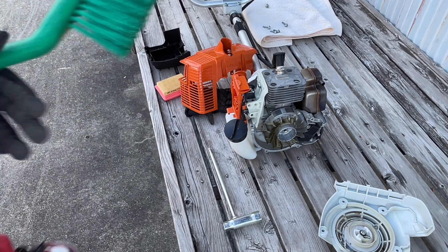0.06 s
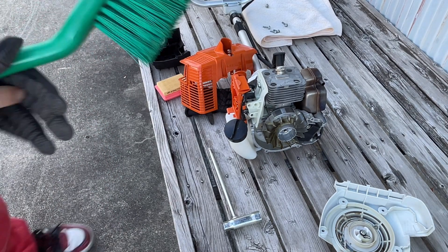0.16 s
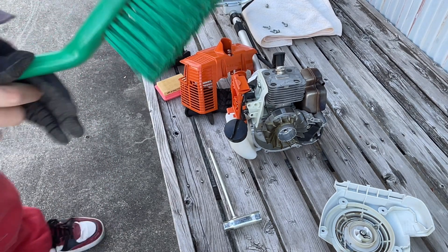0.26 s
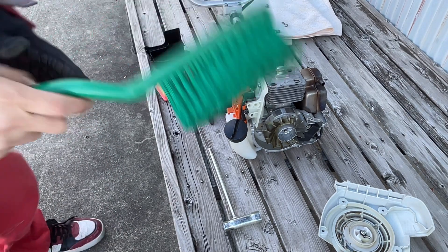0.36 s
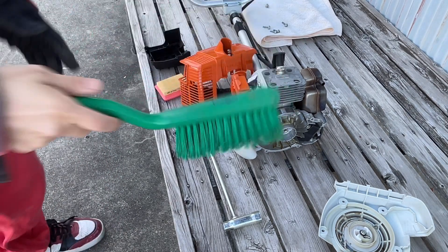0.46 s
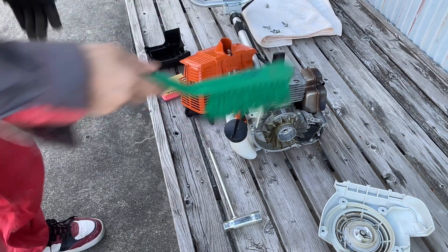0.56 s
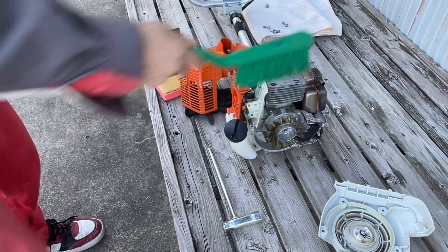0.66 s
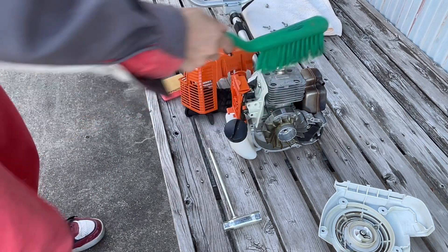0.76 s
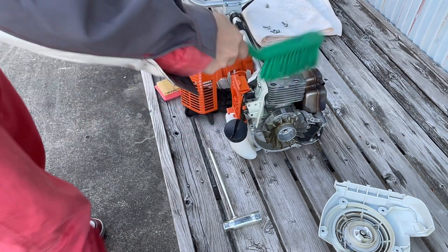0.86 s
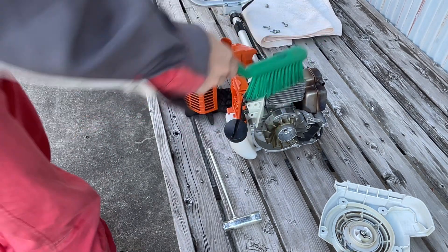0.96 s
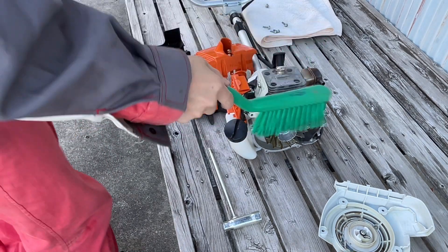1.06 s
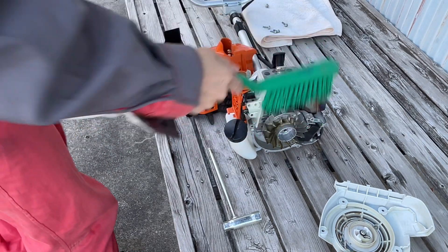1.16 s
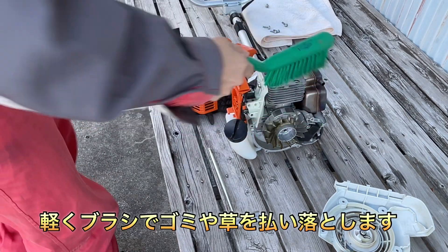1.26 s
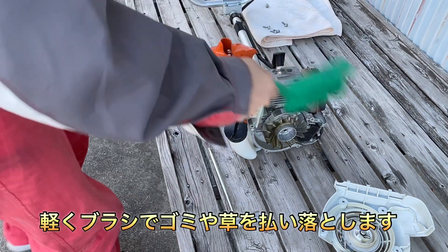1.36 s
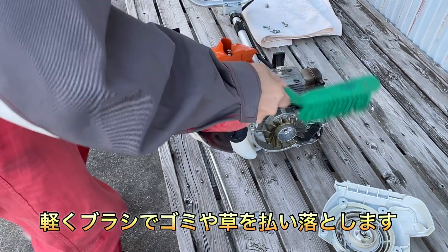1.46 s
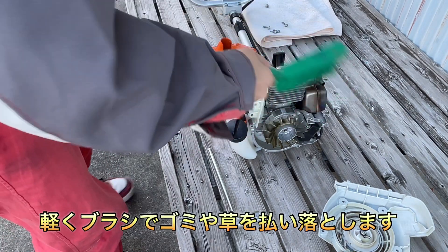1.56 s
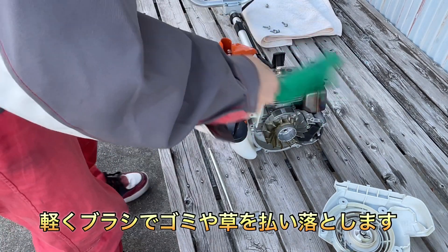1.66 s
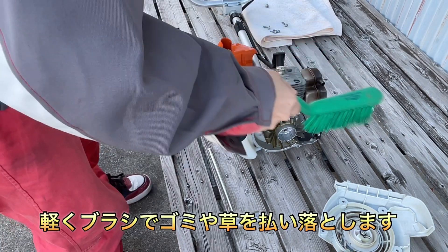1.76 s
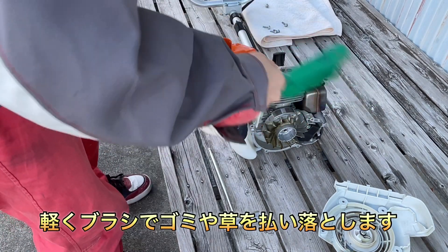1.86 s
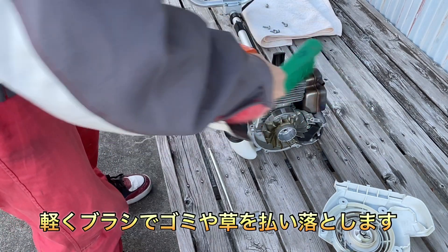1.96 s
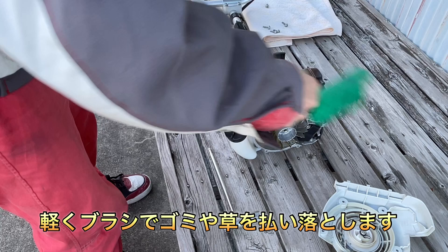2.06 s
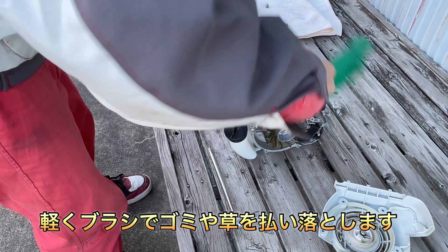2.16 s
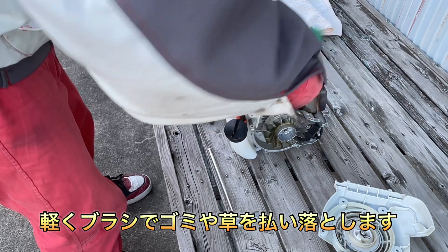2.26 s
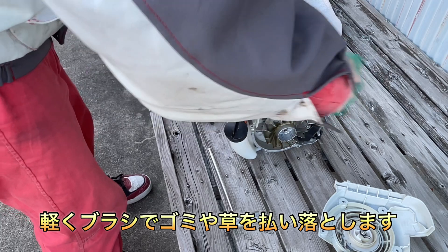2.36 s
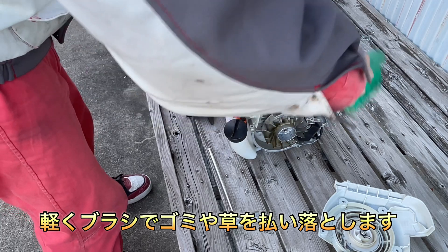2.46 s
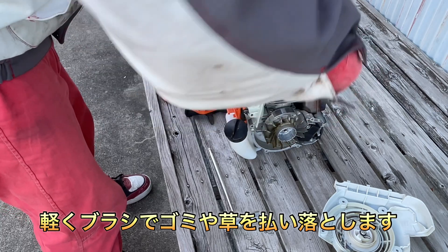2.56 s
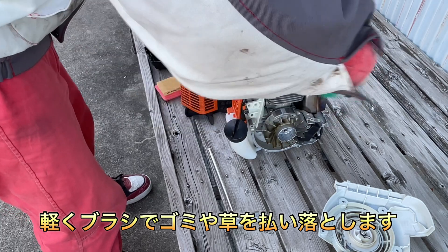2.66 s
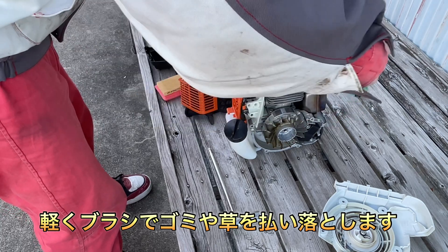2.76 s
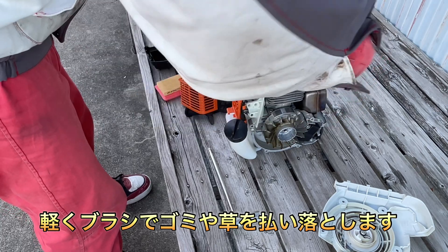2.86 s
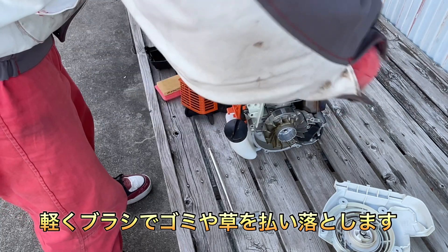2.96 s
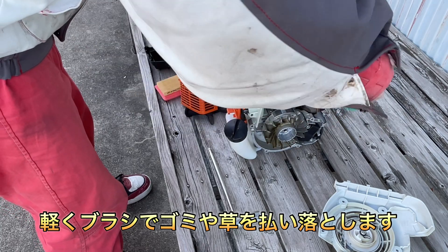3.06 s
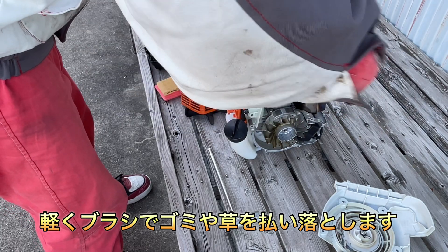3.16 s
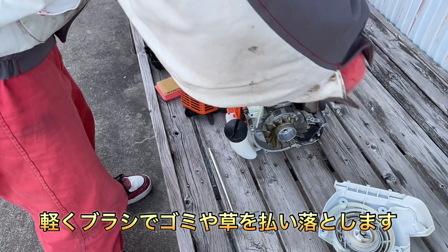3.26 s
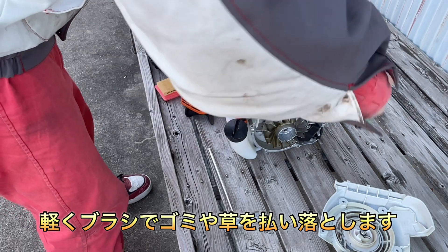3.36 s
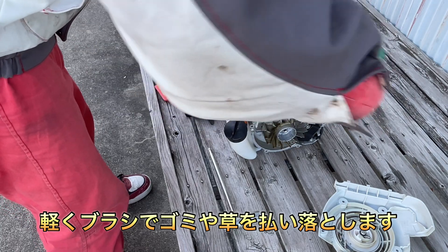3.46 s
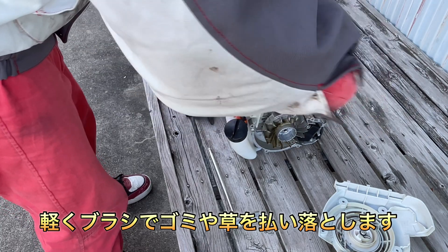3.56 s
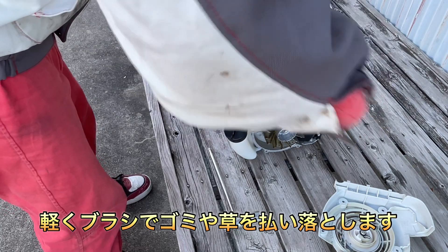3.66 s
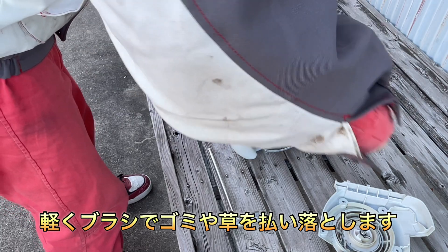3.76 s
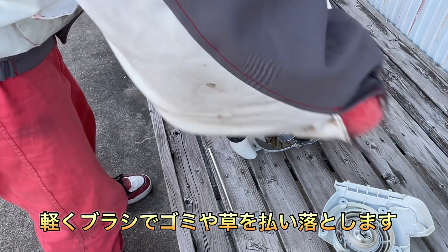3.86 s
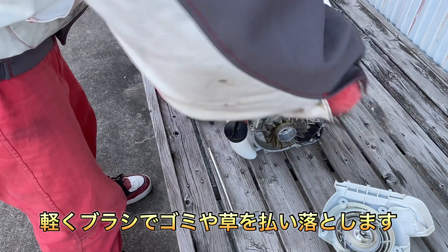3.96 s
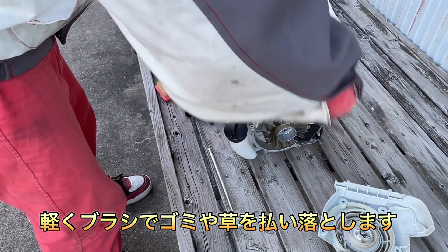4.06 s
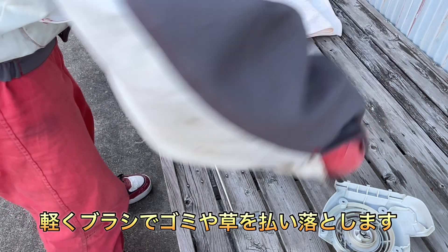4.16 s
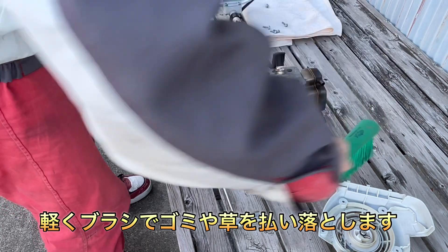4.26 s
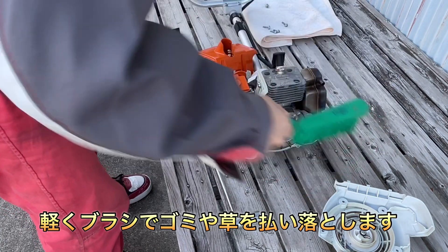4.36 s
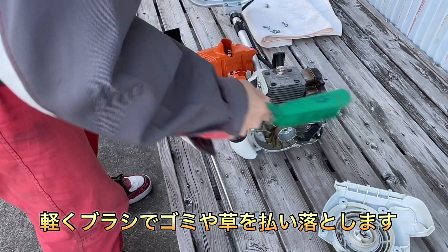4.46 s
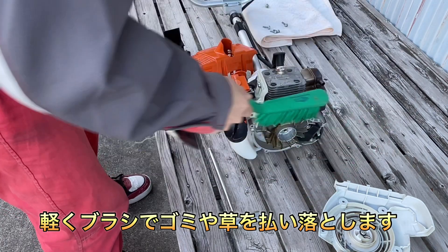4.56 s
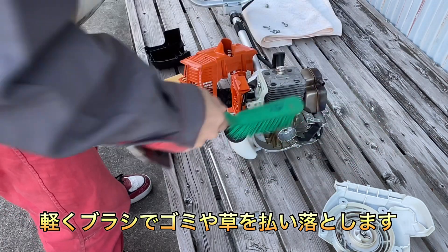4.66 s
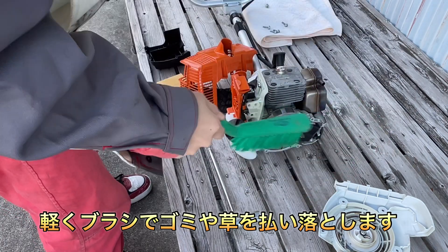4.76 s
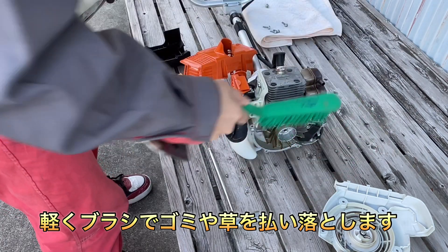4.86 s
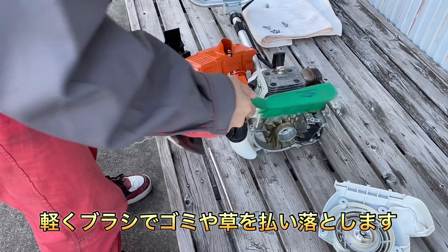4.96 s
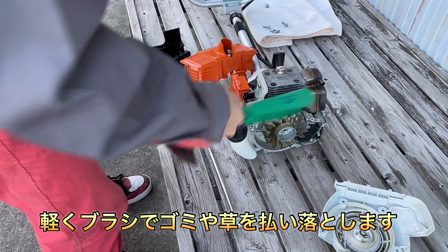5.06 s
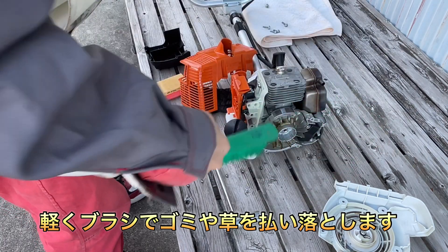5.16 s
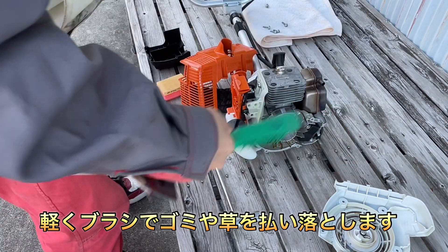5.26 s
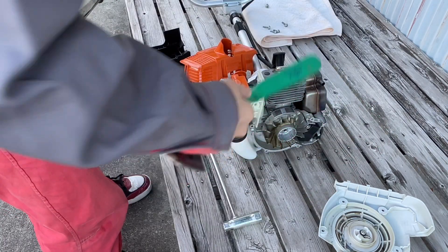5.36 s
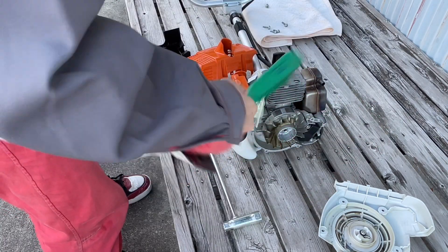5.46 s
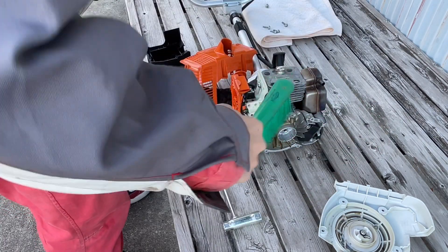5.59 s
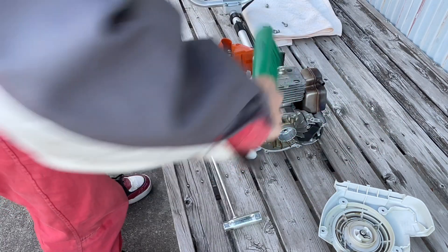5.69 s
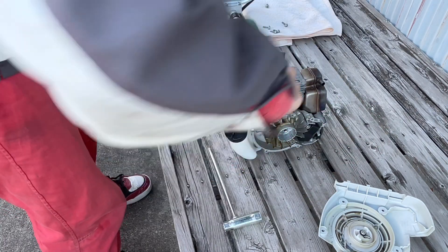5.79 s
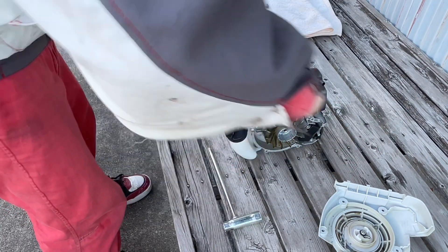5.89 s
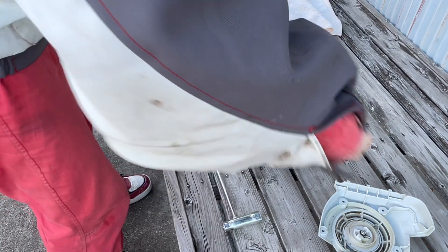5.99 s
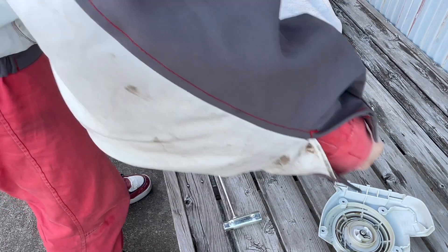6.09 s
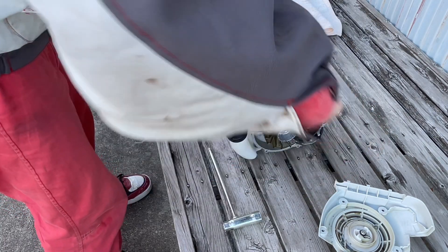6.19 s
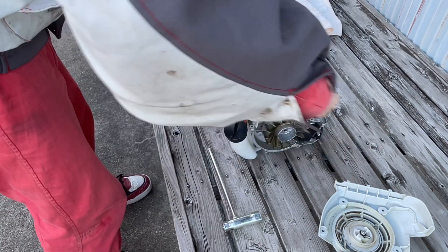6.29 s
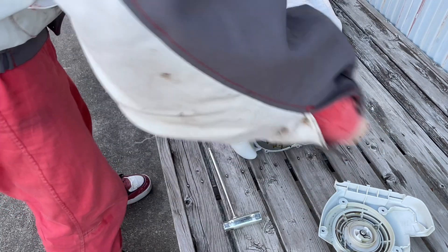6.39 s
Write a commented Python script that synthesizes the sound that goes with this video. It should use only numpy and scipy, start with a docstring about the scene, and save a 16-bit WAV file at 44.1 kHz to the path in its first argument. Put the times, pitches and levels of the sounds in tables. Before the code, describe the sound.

Outdoors on a plank deck, close stereo microphone, faint distant traffic and air throughout. From 0 to 0.85 s there are only low wind thumps and a few faint wooden knocks. At 0.9 s a stiff plastic brush lands on small metal fins with a bright, scratchy slap; wind buffets hard around 1.0-1.8 s, then mostly dies down. Strokes follow every third of a second until about 4.0 s, each a short rasping swish with fizzing bristle tips, a thin metallic ring and a flick as bristles spring free. From 2.3 to 4.3 s the fins ring more clearly and the rocking engine's feet knock in hollow double or triple taps on the boards. The pace then eases: softer strokes near 4.5, 5.0, 5.45, 5.85 and 6.3 s, with a sharp high metallic tick at 5.0 s, a few pinging fins and light knocks at 5.9 and 6.35 s.

```python
"""A plank deck outdoors: a stiff plastic brush slaps and drags across the cooling fins of a small engine.
Bursts of random bristle snaps drive resonant fins; a few freed fins ring on as decaying sines.
Each stroke rocks the engine, whose feet knock on the boards: short pulses through plank resonances.
Wind rumbles and thumps at the two microphone ports as low filtered noise and brief low waves.
Behind it lies the distant hush of the yard, noise shaped in short-time spectra."""
import sys
import numpy as np
from scipy import signal
from scipy.fft import rfft, irfft, next_fast_len
from scipy.io import wavfile
from scipy.ndimage import uniform_filter1d

SR = 44100
rng = np.random.default_rng(int(sys.argv[2]) if len(sys.argv) > 2 else 0)


def file_out(sig):
    """Save sig as 16-bit WAV at sys.argv[1]."""
    # one column per channel
    cols = np.atleast_2d(sig).T
    # limit, then scale
    lim = np.clip(cols, -1, 1)
    pcm = np.round(lim * 32767).astype(np.int16)
    wavfile.write(sys.argv[1], SR, pcm)


N = 283563

# the bristles land on the fins:
# (time_s, level_db, thick_fin_hz, thick_fin_db, thin_fin_hz, thin_fin_db, landing_ms)
SLAPS = [(0.9036, -23, 2100, -22, 4160, -5, 3.36), (1.3112, -26.5, 2030, -17, 3750, -12, 6.4),
         (1.6122, -29.5, 2140, -7.5, 3750, -7.5, 5.6), (1.936, -26.5, 2180, -11.5, 3900, -8.5, 4.7),
         (2.2751, -27, 1677, -1, 4010, 2.5, 3.25), (2.6029, -21, 1988, 7, 4180, -2.5, 4.1),
         (2.9052, -22.5, 1974, 3, 4450, 3, 3.4), (3.2473, -24, 1958, 2.5, 4410, 2.5, 4.06),
         (3.6078, -24, 1981, 4.5, 4350, -1.5, 4.76), (4.0313, -22, 1160, -9, 4300, -8, 4.5),
         (4.4895, -45, 1300, -14, 4340, -1.5, 7.4), (4.512, -38, 1936, 0.5, 4300, -2.5, 7.4),
         (4.9685, -41.5, 1600, -1, 3910, -18, 4.2), (4.9784, -29.5, 1475, -13.5, 3830, -30, 6.8),
         (5.4638, -28, 2140, -16, 4210, -4.5, 10), (5.8303, -33.5, 2184, 6.5, 3970, 2.5, 9.5),
         (6.277, -28.5, 1580, -7.5, 3880, -1.5, 11.8)]
LAND_LEAD_S = 0.00395  # the bristles touch this long before the listed time
TIPS_DB_PER_MS = -0.58  # a slower landing leans less on the tips, all through the stroke


def amp(db):
    """Amplitude ratio of a level in dB."""
    return 10 ** (np.asarray(db) / 20)


def evened(x):
    """The signal scaled to an rms of 1."""
    return x / np.sqrt(np.mean(x ** 2) + 1e-20)


def read(points, hz):
    """Value at hz of a curve of (hz, value) points, straight over log frequency."""
    f, value = np.transpose(points)
    return np.interp(np.log(hz + 1), np.log(f + 1), value)


def add(mix, s, sound):
    """Lay a sound into the mix at s seconds, cut off at the end."""
    part = mix[round(s * SR):][:len(sound)]
    part += sound[:len(part)]


def resonate(x, hz, width):
    """Resonance that follows hz: shift to 0 Hz, smooth, shift back; white noise keeps its rms."""
    turn = np.exp(2j * np.pi * np.cumsum(hz * np.ones(len(x))) / SR)
    r = np.exp(-np.pi * width / SR)
    smooth = signal.lfilter([1 - r], [1, -r], x / turn)
    return 2 * (turn * smooth).real / np.sqrt(np.pi * width / SR)


def ring(x, modes, detune=1, patchy_db=0):
    """Sum of resonances (hz, width_hz, level_db); the contact with each one comes and goes."""
    drift = uniform_filter1d(rng.standard_normal((len(modes), N // 64 + 1)), 14, 1)
    contact = amp(patchy_db * np.clip(evened(drift), -3, 1.5))  # one value per 64 samples
    out = np.zeros(N)
    for k, (hz, width, db) in enumerate(modes):
        drive = x * np.repeat(contact[k], 64)[:N]
        out += (-1) ** k * amp(db) * resonate(drive, hz * detune, width)
    return out


def colour(x, points):
    """Causal minimum-phase filter with the given spectrum, its taps scaled to energy 1."""
    log_gain = np.log(amp(read(points, abs(np.fft.fftfreq(2048, 1 / SR)))))
    taps = np.fft.ifft(np.exp(np.conj(signal.hilbert(log_gain)))).real[:1024]
    return signal.oaconvolve(x, taps / np.linalg.norm(taps))[:N]


def wavering(hz, width):
    """A tone of nearly steady strength whose pitch wanders: narrow noise divided by its envelope."""
    x = resonate(rng.standard_normal(N), hz, width)
    return x / (abs(signal.hilbert(x)) + 0.15)


def bristles(per_s, spread_db):
    """Dense random snaps of single bristles, a few of them strong."""
    size = amp(spread_db * np.minimum(rng.exponential(1, N), 5))
    return evened(size * rng.standard_normal(N) * (rng.random(N) < per_s / SR))


def land(thick, thin, low, shafts, tips):
    """Each landing adds a quick swell and decay to the strength of every part it excites."""
    shafts_db, tips_db, body_db = -5, -3.5, -21.5  # shares of a landing
    body_db_per_ms = 1.5  # a slower, flatter landing spreads over more of the cylinder
    thick_lead_s = 0.0039
    for s, db, _, thick_db, _, thin_db, ms in SLAPS:
        u = np.arange(round(.08 * SR)) / SR / (ms / 1000)
        late = 0.033 * (1 - np.exp(-u)) * np.exp(-u / 1.2)  # late bristles trail in
        landing = amp(db) * ((u * np.exp(1 - u)) ** 2.14 + late)
        shares = ((thin, thin_db), (low, body_db + body_db_per_ms * ms),
                  (shafts, shafts_db), (tips, tips_db + TIPS_DB_PER_MS * ms))
        for line, gain_db in shares:
            add(line, s - LAND_LEAD_S, amp(gain_db) * landing)
        slow = u / 1.19  # the thick fin takes longer to build up
        build = (slow * np.exp(1 - slow)) ** 3.0 + 0.025 * slow * np.exp(-slow / 0.91)
        add(thick, s - thick_lead_s, amp(db + thick_db) * build)


def drag(low, shafts, tips):
    """After landing the bristles drag under a held pressure, then flick free."""
    # the flick that ends each drag: (flick_start_s, flick_end_s, drag_db, flick_db)
    drag_table = [(0.962, 1.011, -50, -43), (1.33, 1.34, -45, -61), (1.673, 1.683, -44, -51),
                  (1.98, 2.012, -52, -43), (2.31, 2.356, -67, -37), (2.65, 2.674, -75, -36),
                  (2.956, 3.005, -62, -38.5), (3.299, 3.333, -54, -36.5), (3.639, 3.684, -60, -42),
                  (4.081, 4.152, -65, -41.5), (4.605, 4.672, -47, -46.5), (5.084, 5.13, -46.5, -35.5),
                  (5.504, 5.539, -48, -37.5), (5.917, 5.998, -45.5, -38.5), (6.34, 6.399, -46, -39.5)]
    after_s, rise_s, rise_db = 0.0043, .01, 34  # the drag swells in behind each landing
    flick_rise_s = 0.013  # the change to the flick takes this long each side of its start
    release_s, release_db = 0.0087, 81
    tips_db, body_db = 2.5, -33
    slaps = np.array(SLAPS)
    for begin, end, drag_db, flick_db in drag_table:
        landed_s, *_, ms = slaps[slaps[:, 0] < begin][-1]
        flick_from, flick_full = begin - flick_rise_s, begin + flick_rise_s
        start = min(landed_s + after_s, flick_from)
        t = np.arange(start - rise_s, end + release_s, 1 / SR)
        turns = [t[0], start, flick_from, flick_full, max(end, flick_full), end + release_s]
        levels = [drag_db - rise_db, drag_db, drag_db, flick_db, flick_db, flick_db - release_db]
        pressure = amp(np.interp(t, turns, levels))
        for line, gain_db in (low, body_db), (shafts, 0), (tips, tips_db + TIPS_DB_PER_MS * ms):
            add(line, t[0], amp(gain_db) * pressure)


def brush():
    """Landing and dragging bristles scratch the metal and drive the fins under them."""
    # fin resonances before detuning: (hz, width_hz, level_db)
    fin_modes = [(2920, 120, -11.5), (3862, 90, 2), (4220, 140, 0.5), (4985, 65, -5.5), (5530, 48, -15),
                 (7560, 480, -8)]
    # higher fin resonances before detuning: (hz, width_hz, level_db)
    top_modes = [(10740, 490, -4.5), (11440, 150, -12), (12700, 290, -9), (16300, 93, -73)]
    # spectrum of the scratching bristle shafts: (hz, level_db)
    scratch_curve = [(700, -27.5), (1300, -5), (2500, -3.5), (3200, -5), (4500, -7), (5500, -1),
                     (7200, 10.5), (7900, 0), (9000, -60)]
    # spectrum of the fizzing bristle tips: (hz, level_db)
    fizz_curve = [(7000, -30), (7900, -1.5), (11000, -.5), (12500, -1.5), (16000, 0)]
    thick, thin, low, shafts, tips = np.zeros((5, N))
    land(thick, thin, low, shafts, tips)
    drag(low, shafts, tips)

    slaps = np.array(SLAPS)
    stroke = np.maximum(np.searchsorted(slaps[:, 0] - LAND_LEAD_S, np.arange(N) / SR) - 1, 0)
    fin = slaps[stroke]
    detune = 1 + 0.033 * rng.standard_normal(len(slaps))[stroke]  # other fins under each landing
    rasp = amp(1.4 * evened(uniform_filter1d(rng.standard_normal(N), 200)))  # tufts catch and let go
    snaps = evened(rasp * bristles(9000, spread_db=2.2))
    shaft_snaps, tip_snaps = shafts * snaps, tips * snaps

    thick_parts = ((1, 0.89), (0.92, 0.11), (.85, 0.23))  # (pitch ratio, share)
    out = thick * sum(wavering(fin[:, 2] * k, 66) * share for k, share in thick_parts)
    out += thin * wavering(fin[:, 4], 300)
    out += 0.078 * resonate(resonate(low * snaps, 2230, 1100), 1900, 860)  # the cylinder body
    out += 0.72 * colour(shaft_snaps, scratch_curve)
    out += 0.15 * ring(shaft_snaps, fin_modes, detune, patchy_db=2.2)
    out += 0.66 * colour(tip_snaps, fizz_curve)
    return out + 0.48 * ring(tip_snaps, top_modes, detune, patchy_db=4.5)


def plucks():
    """Each fin the brush frees swells for a few ms and dies away as a decaying sine."""
    # the brush frees a fin: (time_s, level_db, fin_letter)
    pluck_table = [(1.66, -41, "a"), (1.66, -44, "d"), (1.66, -41.5, "f"), (2.0, -48, "d"),
                   (2.36, -62, "g"), (2.615, -37, "d"), (2.69, -62.5, "c"), (2.69, -64, "g"),
                   (2.995, -55, "c"), (3.0, -62, "g"), (3.33, -58.5, "c"), (3.33, -63, "g"),
                   (3.7, -55.5, "c"), (4.093, -30, "b"), (4.15, -62, "g"), (4.65, -46, "f"),
                   (4.975, -16.5, "h"), (5.105, -36, "i"), (5.905, -31.5, "e"), (5.945, -32.5, "f"),
                   (5.99, -50, "g")]
    # fins that ring on, by letter: (pitch_hz, t60_s)
    ring_table = {"a": (2090, .1), "b": (2450, .053), "c": (2552, .7), "d": (3870, .1), "e": (4160, .065),
                  "f": (4410, .14), "g": (4830, .24), "h": (7400, .04), "i": (2190, .06)}
    out, t = np.zeros(N), np.arange(SR // 2) / SR
    for s, db, letter in pluck_table:
        hz, t60 = ring_table[letter]
        swell = 1 - np.exp(-t / 0.0029)
        add(out, s, amp(db - 60 * t / t60) * swell * np.sin(2 * np.pi * hz * t))
    return out


def knocks():
    """A foot strikes, then the weight follows: stiff plank modes ring first, the low ones swell after."""
    # the engine's feet knock on the planks, about 21 times a second while it rocks: (time_s, level_db)
    knock_table = [(0.128, -49), (0.223, -45), (0.503, -47.5), (0.847, -44.5), (0.943, -36.5), (1.088, -41),
                   (1.351, -40.5), (1.4, -54), (1.498, -44), (1.653, -36.5), (1.701, -36.5), (1.981, -38),
                   (2.025, -46), (2.071, -41.5), (2.309, -30), (2.358, -29), (2.402, -36.5), (2.641, -33),
                   (2.689, -28.5), (2.74, -35), (2.796, -46), (2.845, -42.5), (2.936, -29), (2.987, -28),
                   (3.028, -34), (3.28, -31), (3.329, -31.5), (3.642, -31), (3.689, -29), (3.734, -33.5),
                   (3.795, -44), (4.069, -28.5), (4.116, -35.5), (4.171, -37.5), (4.264, -43),
                   (4.313, -37.5), (5.885, -41.5), (5.934, -37.5), (5.982, -44), (6.328, -35),
                   (6.373, -39.5)]
    # low plank modes before detuning: (hz, width_hz, level_db)
    low_modes = [(202.6, 14, -5), (390, 33, 4), (503, 210, -13)]
    # stiff plank modes before detuning: (hz, width_hz, level_db)
    high_modes = [(463, 290, 0), (720, 76, 5), (971, 39, 0), (1167, 30, -2.5), (1590, 480, -1.5)]
    rock_gap_s = .07  # a longer pause starts a new rocking
    bright_start_db, dulling_db_per_s = 4, 50  # the stiff modes fade as the rocking settles
    low_lag_s, high_lead_s = .002, .003
    low, high, u = np.zeros(N), np.zeros(N), np.arange(900) / SR
    grit = rng.standard_normal((len(knock_table), 901))
    times = np.transpose(knock_table)[0]
    began = np.maximum.accumulate(times * (np.diff(times, prepend=-1) > rock_gap_s))
    for (s, db), first_s, noise in zip(knock_table, began, grit[:, 1:]):
        bright_db = bright_start_db - dulling_db_per_s * (s - first_s)
        weight = u / 0.00091 * np.exp(-u / 0.00092) + 0.1 * noise * np.exp(-u / 0.028)
        strike = u / 0.00062 * np.exp(-u / 0.00039) + 0.14 * noise * u / 0.0032 * np.exp(-u / 0.0071)
        add(low, s + low_lag_s, amp(db) * weight)
        add(high, s - high_lead_s, amp(db + bright_db) * strike)
    spot = np.maximum(np.searchsorted(times - high_lead_s, np.arange(N) / SR) - 1, 0)
    detune = 1 + 0.035 * grit[spot, 0]  # each foot lands on a slightly different spot
    return ring(low, low_modes, detune, patchy_db=2.5) + ring(high, high_modes, detune, patchy_db=3.0)


def deck(x):
    """Random echoes off planks, wall and sleeve, dying 60 dB in about 0.14 s, partly different at each port."""
    t = np.arange(SR // 2) / SR
    hits = rng.choice([-1., 1.], (3, len(t))) * (rng.random((3, len(t))) < 4000 / SR)
    hits *= 1 - np.exp(-t / 0.00044)
    decay = amp(-60 * t / 0.14) + amp(-26.0 - 60 * t / 0.13)
    taps = (hits[:2] + 1.78 * hits[2]) * decay  # the third set is common to both ports
    taps /= np.linalg.norm(taps, axis=1, keepdims=True)
    return signal.fftconvolve(x[None], taps, axes=1)[:, :N]


def wind():
    """Eddies at the ports: a low lumpy rumble and single thumps, mostly common to both."""
    # level of the rumble: (time_s, level_db)
    rumble_table = [(0.0, -39), (0.16, -43), (0.3, -50.5), (0.99, -44.5), (1.11, -33.5), (1.29, -43.5),
                    (1.41, -36), (2.0, -84), (2.36, -59), (2.76, -50), (3.33, -47), (3.47, -52.5),
                    (3.89, -50.5), (5.03, -50.5), (5.19, -48), (5.69, -49.5), (5.82, -47.5), (6.43, -47)]
    # single eddies thump the ports: (time_s, level_db, pitch_hz)
    thump_table = [(0.03, -31, 63), (0.23, -32, 68), (0.655, -30, 61), (0.99, -23.5, 64),
                   (1.016, -28.5, 115), (1.066, -18, 64), (1.094, -28, 90.5), (1.142, -22, 63.6),
                   (1.226, -27, 60.4), (1.309, -33.5, 65), (1.423, -20, 72), (1.707, -27, 90),
                   (1.725, -22.5, 154), (1.792, -32, 73), (4.774, -38.5, 66), (5.075, -34.5, 63.6),
                   (5.451, -32.5, 58.6)]
    thump_cycles = 1.3
    # a puff of rough air rises with each thump and dies away after it
    puff_db, puff_hz, puff_width_hz, puff_s = -19.5, 157.4, 123, 0.019
    noises = rng.standard_normal((3, N))
    common, left, right = (resonate(resonate(z, 57, 54), 51, 107) for z in noises)
    envelope = abs(signal.hilbert(common))
    common = evened(common / (envelope + 0.18 * common.std()) ** 0.41)  # partly levelled
    level = amp(np.interp(np.arange(N) / SR, *np.transpose(rumble_table)))
    rumble = level * (common + 0.45 * evened(np.array([left, right])))
    thumps, puffs = np.zeros((2, N))
    for s, db, hz in thump_table:
        t = np.arange(-min(s, .06), .06, 1 / SR)
        bell = np.exp(-(2 * t * hz / thump_cycles) ** 2)
        add(thumps, s + t[0], amp(db) * np.cos(2 * np.pi * hz * t) * bell)
        u = (t - t[0]) / puff_s
        add(puffs, max(s - puff_s, 0), amp(db + puff_db) * u * np.exp(1 - u))
    air = resonate(rng.standard_normal(N), puff_hz, puff_width_hz)
    air = evened(resonate(air, puff_hz, puff_width_hz))
    return rumble + thumps + puffs * air


def hush():
    """Far traffic and air: random spectra, patches drift; the treble slowly sinks, returns, sinks again."""
    # base spectrum: (hz, level_db_per_hz)
    hush_curve = [(30, -76), (70, -77.5), (170, -73), (350, -81.5), (860, -84.5), (1900, -93.5),
                  (3600, -96), (5700, -103), (8000, -104), (11400, -108), (15500, -109)]
    # treble level, of which only the change from the first point counts: (time_s, level_db)
    treble_table = [(0.0, -72), (1.81, -78), (3.93, -81.5), (4.8, -75.5), (6.25, -81.5)]
    # left-right likeness, 1 when both are the same: (hz, likeness)
    likeness_curve = [(100, 0.99), (350, 0.49), (900, 0.034), (1600, 0.028), (3000, 0.27), (6000, 1),
                      (12000, 1)]
    frames, hz = N // 256 + 5, np.fft.rfftfreq(1024, 1 / SR)
    a, b, c, d, patches = rng.standard_normal((frames, 513, 5)).T
    patches = evened(uniform_filter1d(uniform_filter1d(patches, 12, 0), 10, 1))
    s, db = np.transpose(treble_table)
    treble_db = np.interp(np.arange(frames) * 256 / SR, s, db - db[0])
    treble_db = treble_db * np.clip(hz / 5000, 0, 1)[:, None]
    same = np.clip(read(likeness_curve, hz), -1, 1)[:, None]
    left, other = a + 1j * b, c + 1j * d
    z = np.array([left, same * left + np.sqrt(1 - same ** 2) * other])
    z *= amp(read(hush_curve, hz)[:, None] + 1.6 * patches + treble_db) * np.sqrt(SR / 1024)
    return signal.istft(z, nperseg=1024, noverlap=768)[1][:, :N]


def scene():
    """Brush and knocks close by, slightly stronger on the right, with deck echoes, wind and hush."""
    metal, feet = brush() + plucks(), knocks()
    direct = (metal + feet) * amp([[-.3], [.3]])
    echoes = amp(-4.5) * deck(metal + amp(-4.5) * feet)  # the knocks travel in the planks and echo less
    return direct + echoes + wind() + hush()


def record(dry):
    """The ports differ in phase, and in the treble the left hears later; a bass cut, then the band limit."""
    # body shading: (hz, left_lead_radians)
    turn_curve = [(150, -.1), (500, -.3), (950, -1.0), (1400, -.5), (2100, -.4), (2600, .3), (3600, 0)]
    lag_from_hz, lag_s, edge_hz = 4900, 1 / 6700, 15850
    size = next_fast_len(N + 2048)
    hz = np.fft.rfftfreq(size, 1 / SR)
    lead = read(turn_curve, hz) / 2 - np.pi * np.maximum(hz - lag_from_hz, 0) * lag_s  # half per port
    bass_cut = 1 / np.sqrt(1 + (38 / (hz + 1)) ** 6)
    phase = np.exp(1j * lead * np.array([[1], [-1]]))
    ports = irfft(rfft(dry, size) * bass_cut * phase, size)[:, :N]
    band = signal.firwin(511, edge_hz, window=("kaiser", 9), fs=SR)
    return signal.oaconvolve(ports, band[None], "same")


dry = scene()
out = record(dry)
file_out(out)
```